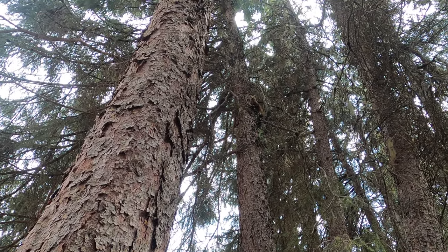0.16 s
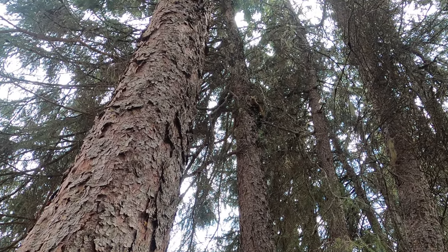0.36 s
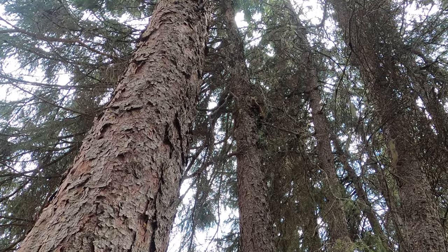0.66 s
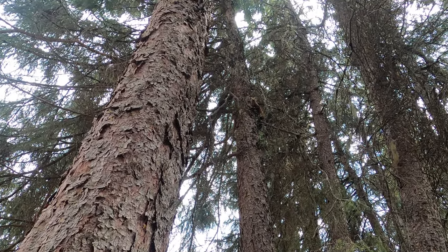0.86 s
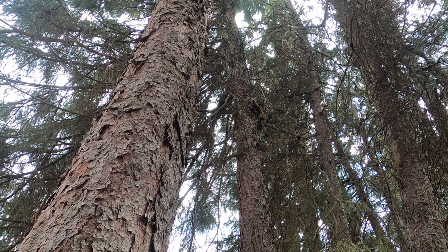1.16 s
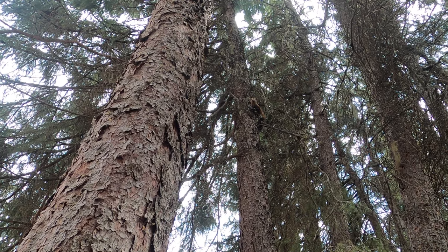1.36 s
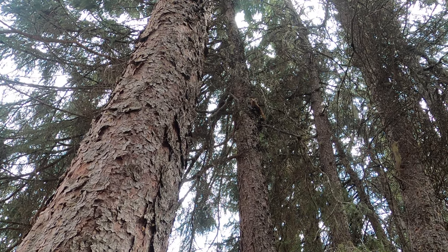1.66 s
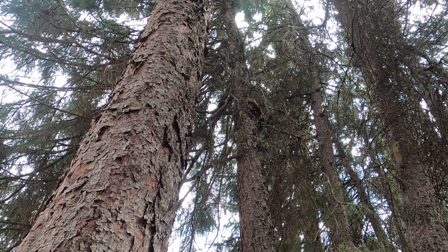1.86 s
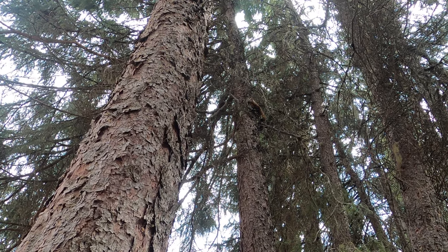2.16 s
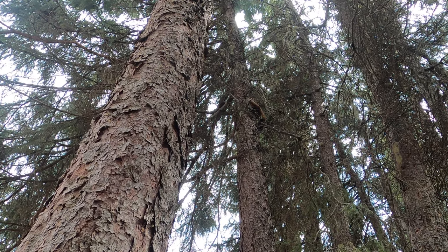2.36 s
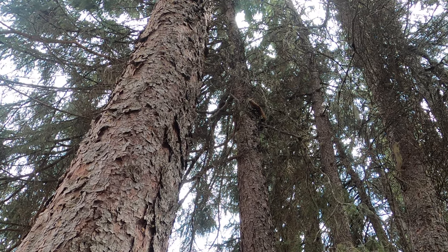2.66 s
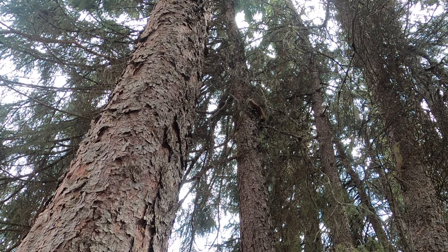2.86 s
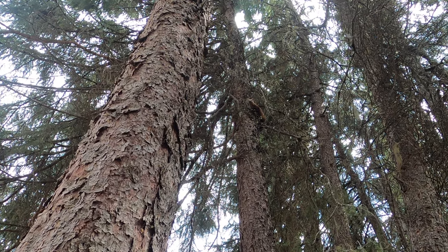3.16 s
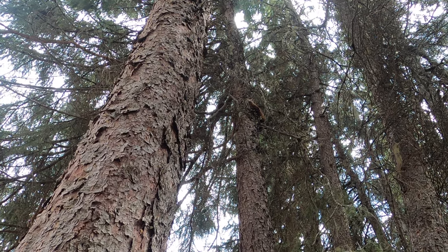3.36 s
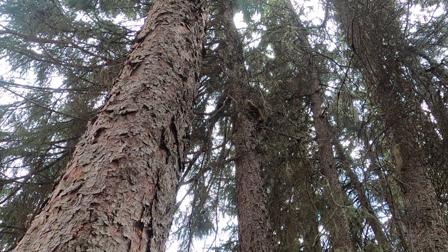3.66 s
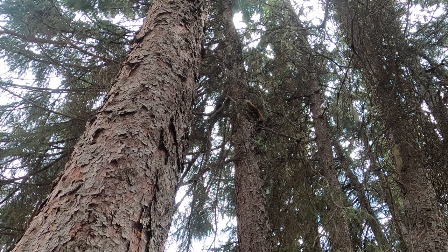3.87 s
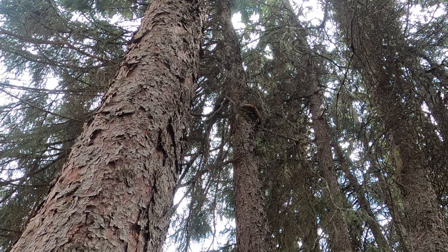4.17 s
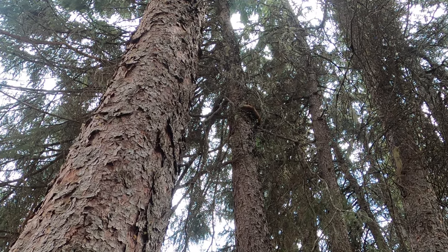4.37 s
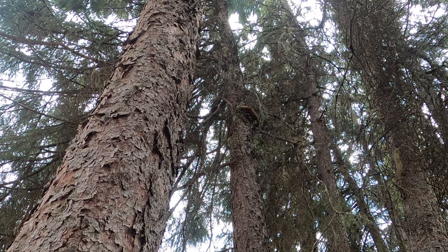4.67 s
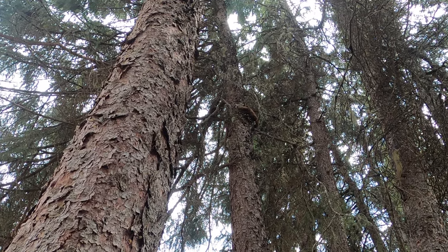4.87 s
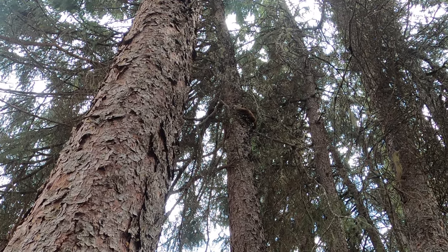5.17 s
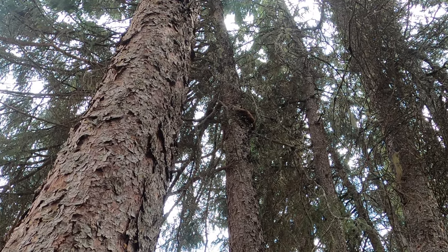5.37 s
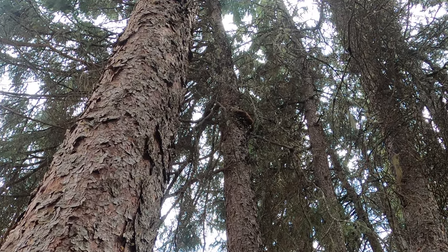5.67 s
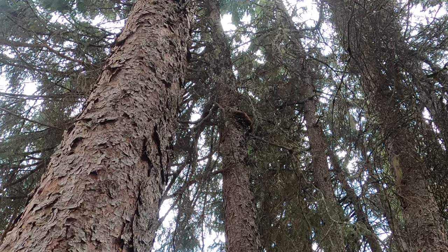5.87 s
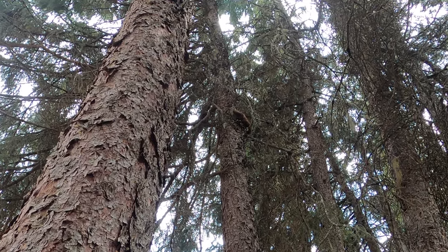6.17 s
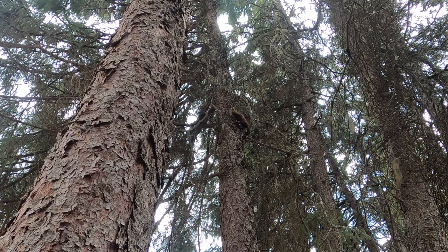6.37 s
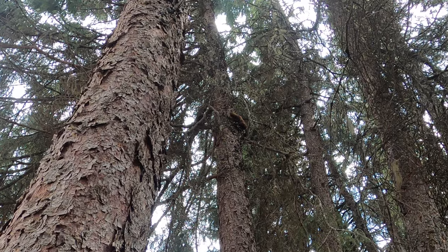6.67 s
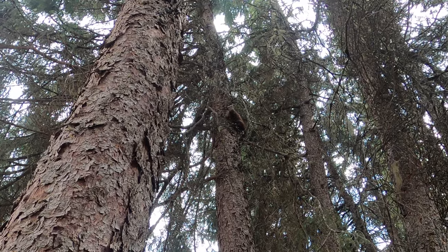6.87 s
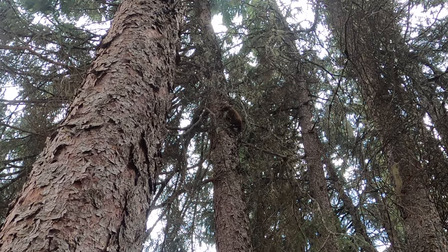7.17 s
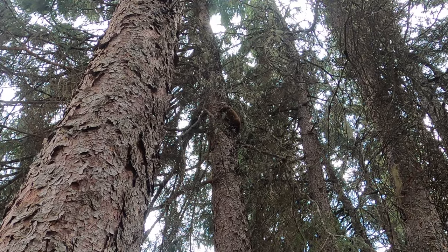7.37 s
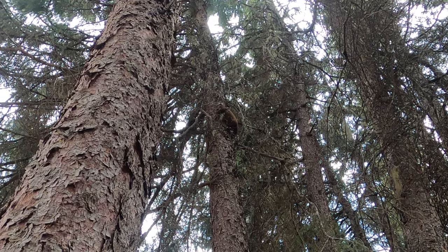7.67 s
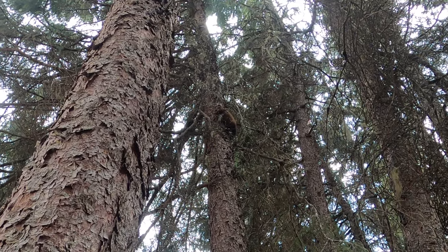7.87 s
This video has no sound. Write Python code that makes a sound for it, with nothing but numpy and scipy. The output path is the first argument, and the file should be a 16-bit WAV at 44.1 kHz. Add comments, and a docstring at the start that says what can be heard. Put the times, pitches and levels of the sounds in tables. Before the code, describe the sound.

Under tall conifers, a small stereo microphone stands in wind. From 0 s a soft, even, wide hiss of needles lies overhead, while irregular low rumbling gusts thump and flutter against the microphone, clearly heaviest on the right and weaker on the left. Close by, faint thin dry rustles and tiny crisp snaps occur, notably near 0, 0.25, 1.1 and 1.7 s, thinning after 4.3 s. A small bird on the left gives very short, high, rising chips at about 0.35, 1.3 and 2.5 s, each with a light woodland echo. Just after 2.5 s everything dips for an instant. Strong gusts come near 1.7 s and 3.3 s, with another at 3.7 s; then buffeting gradually weakens, with smaller bumps around 5.2 and 5.9 s. A fainter chip follows at 6.4 s. From about 7 s almost only the gentle treetop hiss remains, with faint rustling near 7.3 and 7.5 s, until 8 s.

```python
"""Under tall conifers, with the two-port microphone of a small camera: from the start the needles hiss evenly
overhead while gusts, trains of short pressure swings from passing eddies, buffet the ports, the right one hardest.
Close by, bursts of thin noise rustle and small ringing snaps tick; from the left a small bird's gliding tone chips
three times, and all sound dips for an instant at 2.5 s. The gusts peak near 3.3 s and then gradually die away;
one weaker chip follows at 6.4 s, with the crowns and faint rustling to the end."""
import sys
import numpy as np
from scipy import signal
from scipy.fft import rfft, irfft, next_fast_len
from scipy.io import wavfile
from scipy.ndimage import uniform_filter1d

SR = 44100
rng = np.random.default_rng(int(sys.argv[2]) if len(sys.argv) > 2 else 0)


def digitize_waveform(pressure):
    """Quantize a signal to 16-bit integers and store it at the path in sys.argv[1].

    Rows of a 2-D input are taken as channels; values are limited to [-1, 1].
    """
    field = np.atleast_2d(pressure).T
    bounded = np.clip(field, -1, 1)
    quanta = np.round(bounded * 32767).astype(np.int16)
    wavfile.write(sys.argv[1], SR, quanta)


def gain_from_decibels(decibels):
    """Convert decibel values to linear amplitude factors."""
    exponent = np.asarray(decibels, float) / 20
    return 10 ** exponent


N = 354123
CONTROL_STEP = 64  # samples between the points of a coarse control


def unit(x):
    """Scaled to rms 1."""
    return x / np.sqrt(np.mean(x ** 2) + 1e-20)


def along(points, hz):
    """(f/Hz, value) points read on a log frequency axis."""
    f, v = np.transpose(points)
    return np.interp(np.log(hz + 1), np.log(f + 1), v)


def curve(rows):
    """The second column against t/s, one value per sample."""
    rows = np.array(rows)
    return np.interp(np.arange(N) / SR, rows[:, 0], rows[:, 1])


def sides(pan_db):
    """Left and right gains for a level difference, left minus right."""
    return gain_from_decibels(np.array([pan_db / 2, -pan_db / 2]))


def filtered(x, response):
    """The spectrum of x times a complex response of frequency."""
    m = next_fast_len(N + SR // 2)
    hz = np.fft.rfftfreq(m, 1 / SR)
    return irfft(rfft(x, m) * response(hz), m)[..., :N]


def swells(rows, rise, fall):
    """Power of each (middle, hold, dB) swell over time: it climbs, holds and sinks at steady dB per s."""
    middle, hold, db = np.transpose(rows)[:3, :, None]
    late = np.arange(0, N, CONTROL_STEP) / SR - middle
    climb = rise * np.maximum(-late - hold / 2, 0)
    sink = fall * np.maximum(late - hold / 2, 0)
    return gain_from_decibels(db - climb - sink) ** 2


def full(x):
    """A coarse control stretched to one value per sample."""
    return np.interp(np.arange(N), np.arange(len(x)) * CONTROL_STEP, x)


def rush(spectrum, alike, patchy_db):
    """Stereo noise of rms 1 with patches of random gain; a mid/side mix sets the likeness of the sides."""
    z = signal.stft(rng.standard_normal((2, N)), nperseg=512)[2]
    field = rng.standard_normal(z.shape[1:])
    field = uniform_filter1d(field, size=6, axis=0)  # across frequency
    field = uniform_filter1d(field, size=12, axis=1)  # across time
    pair = signal.istft(z * gain_from_decibels(patchy_db * unit(field)), nperseg=512)[1][:, :N]

    def response(hz):
        turn = np.arccos(np.clip(along(alike, hz), -1, 1)) / 2
        return gain_from_decibels(along(spectrum, hz)) * [np.cos(turn), np.sin(turn)]

    mid, side = filtered(pair, response)
    return unit(np.array([mid + side, mid - side]))


# wind in the crowns far overhead, before the left-right lean: (t/s, level/dB)
CROWN_LEVEL = [(0, -57.5), (3.2, -58), (6.0, -57), (8.03, -56)]
# relative colour of the needles' hiss: (f/Hz, level/dB)
NEEDLE_COLOUR = [(24, -36.5), (60, -11), (118, -12.5), (170, -7), (296, -14), (460, -11.5), (800, -10.5),
                 (1010, -5.5), (1350, -3), (2430, -7), (5200, -20.5), (7000, -30.5), (8500, -42.5),
                 (10500, -56), (15500, -60.5)]
# how alike the hiss is at the two ports: (f/Hz, correlation from 0 to 1)
CROWN_LIKENESS = [(350, 0.62), (840, 0.8), (2010, 0.74), (4840, 0.35), (8000, 0.13)]
# which way the hiss leans: (f/Hz, left minus right level/dB)
CROWN_LEAN = [(350, -2), (840, -1), (2010, 3.5), (4840, 0.2)]


def crowns():
    """Countless needles far overhead add up to a smooth, wide noise."""
    hiss = rush(NEEDLE_COLOUR, CROWN_LIKENESS, patchy_db=0.83)
    leaning = filtered(hiss, lambda hz: sides(along(CROWN_LEAN, hz)))
    return gain_from_decibels(curve(CROWN_LEVEL)) * leaning


# bird calls off to the left, before panning: (t/s of the loud part, level/dB, top pitch f/Hz)
BIRD_CALLS = [(.353, -52, 4080), (1.311, -53.5, 3970), (2.5049, -52, 4090), (6.4436, -61, 3880)]
# one call, a rising slide into an arch:
# (t/s from the loud part, pitch over top pitch, level/dB re the call, octave overtone level/dB re the call)
CALL_SHAPE = [(-.018, .53, -45, -40), (-.014, .58, -35, -24), (-.005, .79, -18, -25), (.002, .89, -10, -40),
              (.005, .945, -2, -40), (.011, 1.0, 0, -38), (.017, .96, -1, -36), (.022, .9, -18, -45)]


def bird():
    """One gliding tone with an octave overtone, repeated from the left, and its echo scattered by the trunks."""
    out = np.zeros((2, N + SR))
    when, ratio, level_db, octave_db = np.transpose(CALL_SHAPE)
    t = np.arange(when[0], when[-1], 1 / SR)
    tail_t = np.arange(SR // 2) / SR
    for s, db, hz in BIRD_CALLS:
        phase = 2 * np.pi * np.cumsum(hz * np.interp(t, when, ratio)) / SR
        call = gain_from_decibels(db + np.interp(t, when, level_db)) * np.sin(phase)
        call += gain_from_decibels(db + np.interp(t, when, octave_db)) * np.sin(2 * phase)
        # the echo swells within some 6 ms and falls 60 dB in 0.65 s
        tail_shape = gain_from_decibels(-60 * tail_t / .65) * (1 - np.exp(-tail_t / .006))
        tail = rng.standard_normal((2, len(tail_t))) * tail_shape
        tail = tail / np.linalg.norm(tail[0])
        heard = gain_from_decibels(-3) * signal.fftconvolve(call[None], tail, axes=1)
        heard[:, :len(t)] += sides(6.7)[:, None] * call
        start = round((s + when[0]) * SR)
        out[:, start:][:, :heard.shape[1]] += heard
    return out[:, :N]


# relative colour of dry friction close by, also of the ticks' clicks: (f/Hz, level/dB)
DRY_COLOUR = [(2000, -33), (5000, 1.5), (8000, -2.5), (11000, -14), (13000, -18.5), (14500, -33)]
# bursts of rustling close to the microphone, before panning: (middle t/s, hold/s, level/dB)
RUSTLE_BURSTS = [(.02, .04, -76), (.26, .05, -75), (.47, .1, -82.5), (.76, .1, -81.5), (.95, .15, -81),
                 (1.11, .06, -73.5), (1.27, .1, -81.5), (1.47, .1, -84), (1.68, .06, -82), (2.02, .08, -83),
                 (2.44, .08, -83), (3.08, .06, -81), (3.24, .03, -82), (3.68, .03, -89), (3.93, .04, -86),
                 (4.29, .03, -91), (7.28, .1, -83), (7.55, .12, -86.5)]


def rustle():
    """Dry friction close by: thin noise, a little to the left, roughened by grains."""
    rise, fall, bed_db = 130, 110, -101  # dB per s, dB per s, dB of the faint bed
    grains = 1 + .3 * uniform_filter1d(rng.exponential(size=N) ** 3, size=60)
    friction = rush(DRY_COLOUR, [(5000, .15)], patchy_db=1.2)
    power = swells(RUSTLE_BURSTS, rise, fall).sum(0) + gain_from_decibels(bed_db) ** 2
    return full(np.sqrt(power)) * sides(3.3)[:, None] * unit(grains * friction)


# snaps close by, before panning: (t/s, click level/dB, ring gain re click/dB, left minus right level/dB)
TICK_EVENTS = [(.038, -62, -8, 8), (.252, -68, -8, 8), (1.113, -61, 4, 20), (1.684, -69, -13, 14),
               (2.459, -70, -12, 14), (3.072, -76, -10, 3), (3.679, -72, -12, -2), (4.2865, -70, -12, -7)]
# what rings in a tick: (f/Hz, relative level/dB, time to fall 60 dB/s)
TICK_RING = [(8600, -2, .015), (9020, -3, .015), (5200, -5, .01), (14000, -20, .008)]


def ticks():
    """Small snaps: a dry click of noise and a short high ring of decaying sines."""
    out = np.zeros((2, N + SR))
    t = np.arange(SR // 20) / SR
    noise = rush(DRY_COLOUR, [(5000, 0.7)], patchy_db=-5)
    ring = sum(gain_from_decibels(db - 60 * t / t60) * np.sin(2 * np.pi * hz * t) for hz, db, t60 in TICK_RING)
    onset = 1 - np.exp(-t / .0002)
    for s, db, ring_db, pan_db in TICK_EVENTS:
        start = round(s * SR)
        click = noise[:, start:][:, :len(t)] * gain_from_decibels(-60 * t / .012)  # 60 dB down in 12 ms
        snap = (click + gain_from_decibels(ring_db) * ring) * onset
        out[:, start:][:, :len(t)] += gain_from_decibels(db) * sides(pan_db)[:, None] * snap
    return out[:, :N]


def buffet(gain, air_speed, eddy_m, spread, scatter_db, vent_hz, even, count):
    """Eddies sweep past a port as smooth pushes and pulls; faster air makes them shorter."""
    draw = rng.standard_normal((count, 3))
    start = (np.arange(count) + rng.random(count)) * N / count
    length_m = eddy_m * np.exp(spread * np.tanh(draw[:, :1]))
    width = length_m / air_speed(start / SR)[:, None]  # s
    span = np.arange(SR // 20)
    size = np.sign(draw[:, 1:2]) * gain_from_decibels(scatter_db * draw[:, 2:])
    push = size * np.exp(-((span - span.mean()) / SR / width) ** 2 / 2)
    places = start.astype(int)[:, None] + span
    pressure = np.bincount(places.ravel(), push.ravel(), N + SR)
    # the capsule's vent lets slow pressure leak away
    pressure = filtered(pressure, lambda hz: (1j * hz / (vent_hz + 1j * hz)) ** 3)[len(span) // 2:]
    # the turbulence is evened out towards a steady strength
    local_power = uniform_filter1d(uniform_filter1d(pressure ** 2, size=2200), size=2200)
    strength = np.abs(local_power) + 1e-6
    steady = unit(pressure / strength ** (even / 2))
    return gain * np.pad(steady, (0, len(span) // 2))


# gusts that strike the right port: (middle t/s, hold/s, level/dB, air speed/(m/s))
RIGHT_PORT_GUSTS = [(0.031, 0.061, -34, 3.06), (0.183, 0.029, -39, 3.7), (0.318, 0.024, -32.5, 3.87),
                    (0.624, .1, -42, 3.1), (0.769, 0.054, -37.5, 3.0), (1.095, 0.09, -40.5, 3.6),
                    (1.316, 0.091, -33, 3.24), (1.553, 0.019, -33, 2.54), (1.694, 0.1, -26.5, 4.9),
                    (1.839, 0.014, -29.5, 4.2), (1.94, 0.044, -32.5, 4.6), (2.062, 0.089, -36.5, 3.2),
                    (2.211, .02, -33.5, 1.7), (2.323, .06, -34.5, 5.4), (2.446, 0.099, -29, 4.1),
                    (2.591, 0.017, -31, 4.9), (2.673, 0.026, -36, 2.25), (2.807, 0.05, -40.5, 2.5),
                    (2.882, 0.067, -33.5, 2.86), (3.276, 0.04, -26.5, 5.87), (3.364, 0.044, -30, 4.5),
                    (3.482, .07, -39.5, 2.7), (3.682, 0.057, -28, 5.83), (3.743, 0.035, -36, 3.2),
                    (3.937, 0.086, -37, 2.8), (4.075, 0.04, -33.5, 3.1), (4.206, 0.12, -45.5, 3.64),
                    (4.443, 0.079, -47, 2.5), (4.619, 0.085, -38.5, 2.7), (5.237, 0.03, -34, 2.55),
                    (5.42, 0.22, -52, 2.5), (5.726, .12, -40, 1.9), (5.876, .05, -33.5, 3.98),
                    (5.955, 0.032, -38, 1.6), (6.124, 0.14, -41, 2.3), (6.355, .03, -44.5, 1.6),
                    (6.549, .1, -43, 1.8), (6.725, .08, -46.5, 2.1), (6.92, 0.02, -46, 1.3),
                    (7.473, .08, -63, 1.9)]
# gusts that curl round to the sheltered left port: (middle t/s, hold/s, level/dB)
LEFT_PORT_GUSTS = [(.12, 0.17, -45.5), (.41, 0.048, -46), (.8, 0.033, -39.5), (1.1, 0.023, -38.5),
                   (1.33, 0.091, -42), (1.56, 0.025, -45), (2.93, 0.016, -35.5), (3.32, 0.049, -38),
                   (3.5, 0.026, -45.5), (4.63, .12, -50), (5.25, 0.036, -40), (5.8, 0.046, -47)]


def ports():
    """The wind works on each microphone port apart; the left one is sheltered."""
    rise, fall = 350, 394  # a gust builds and dies, dB per s
    lull_db, lull_speed = -65.5, 2.6  # the air between gusts, dB and m/s
    # the left port also feels the right port's wind: its swing as a share,
    # its level in dB for a right level of -30 dB, and the left air speed in m/s
    shelter_share, shelter_db, shelter_speed = 0.55, -47.5, 2.58
    gusts = swells(RIGHT_PORT_GUSTS, rise, fall)
    lull = gain_from_decibels(lull_db) ** 2
    right_power = gusts.sum(0) + lull
    gust_speeds = np.transpose(RIGHT_PORT_GUSTS)[3]
    # the strongest air decides the speed
    speed = full((gust_speeds @ gusts + lull_speed * lull) / right_power)
    shared = gain_from_decibels(shelter_db) ** 2 * (right_power / gain_from_decibels(-30) ** 2) ** shelter_share
    left_power = swells(LEFT_PORT_GUSTS, rise, fall).sum(0) + shared
    right = buffet(full(np.sqrt(right_power)), lambda t: speed[(t * SR).astype(int)], eddy_m=0.0097,
                   spread=0.5, scatter_db=5.0, vent_hz=24.0, even=0.86, count=800)
    left = buffet(full(np.sqrt(left_power)), lambda t: np.full_like(t, shelter_speed), eddy_m=0.0089,
                  spread=0.32, scatter_db=3.5, vent_hz=25.7, even=0.63, count=600)
    return np.array([left + .015 * right, right])


def scene():
    """Everything that reaches the two ports of the microphone."""
    return crowns() + bird() + rustle() + ticks() + ports()


def band_limit(x):
    """A steep low-pass at the top of the band."""
    return signal.sosfilt(signal.butter(12, 15600, fs=SR, output="sos"), x)


# a brief dip of everything: (middle t/s, time from the middle to 1/e of the depth/s, depth level/dB)
LEVEL_DIP = (2.534, .004, -14)


def record(dry):
    """The level of the whole mix dips for an instant, along a bell curve in dB."""
    middle, half_width, depth_db = LEVEL_DIP
    t = np.arange(N) / SR
    dip = gain_from_decibels(depth_db * np.exp(-((t - middle) / half_width) ** 2))
    mix = dry * dip
    return band_limit(mix)


dry = scene()
out = record(dry)
digitize_waveform(out)
```